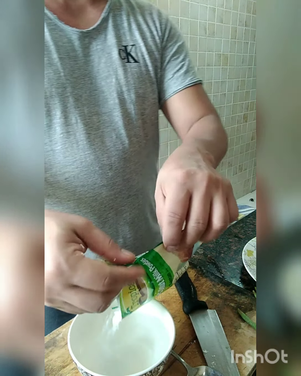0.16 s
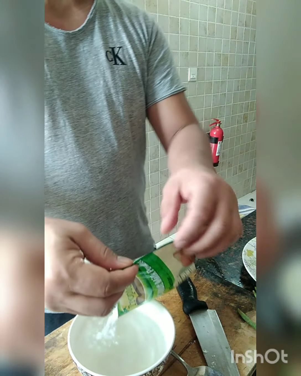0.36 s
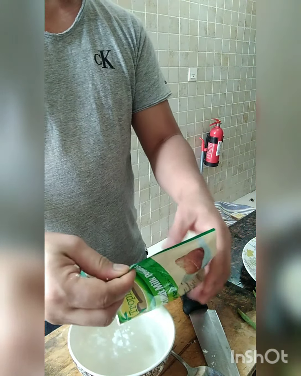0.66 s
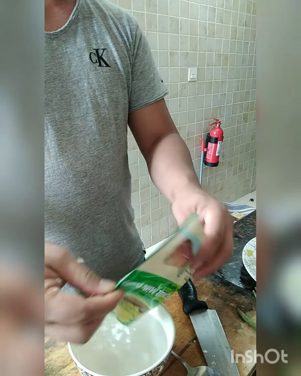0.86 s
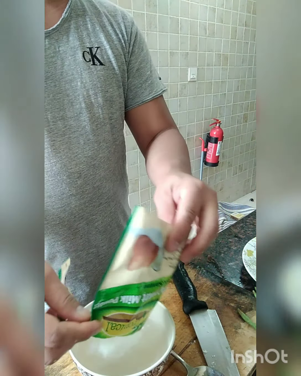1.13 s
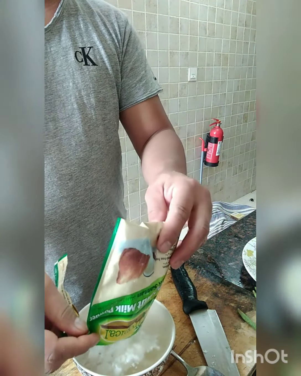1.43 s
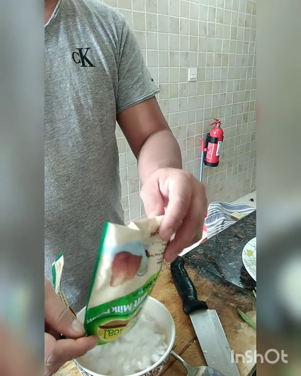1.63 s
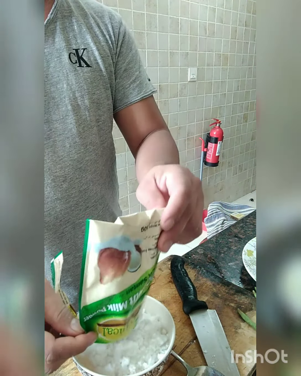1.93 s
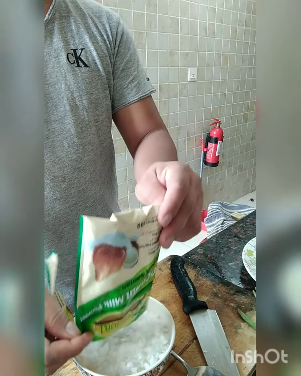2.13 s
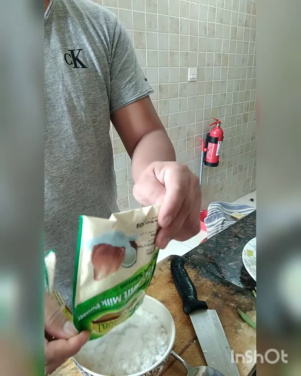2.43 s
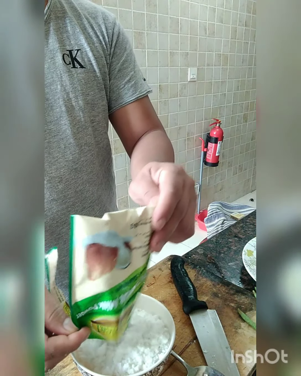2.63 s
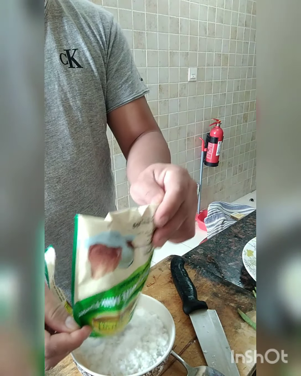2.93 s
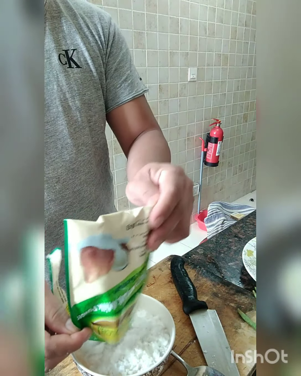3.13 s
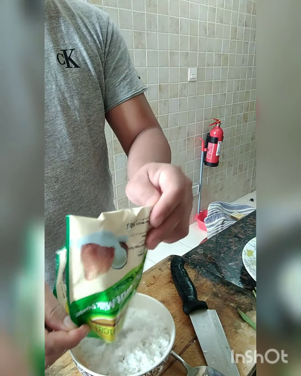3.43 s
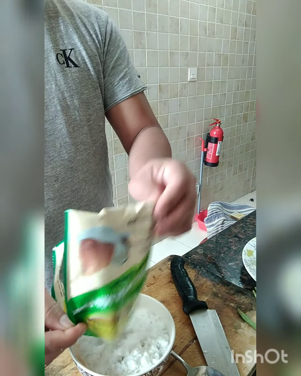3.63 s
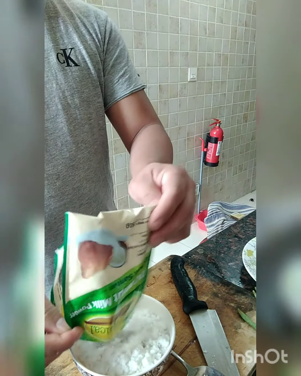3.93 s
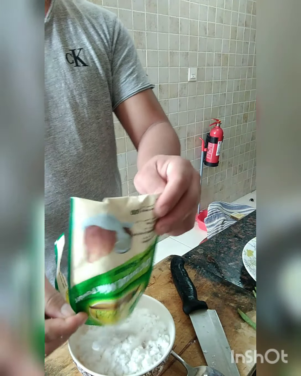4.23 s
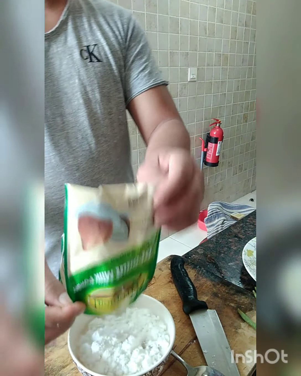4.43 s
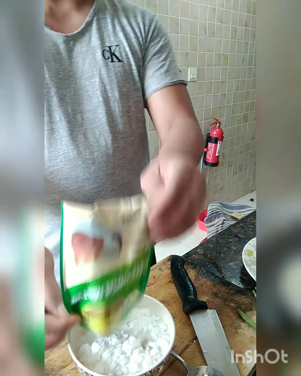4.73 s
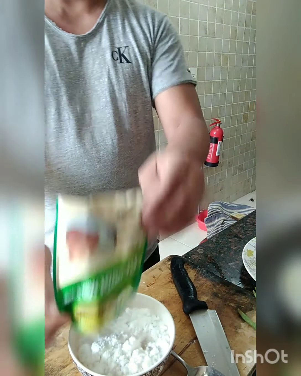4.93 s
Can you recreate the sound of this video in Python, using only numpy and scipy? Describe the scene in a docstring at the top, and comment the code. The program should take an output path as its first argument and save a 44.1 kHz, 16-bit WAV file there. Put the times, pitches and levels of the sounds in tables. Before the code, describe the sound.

A foil-lined plastic packet crackles and snaps sharply in the hands as it is shaken over a bowl in a tiled kitchen.

```python
"""Tiled kitchen: a foil-lined plastic sachet is flexed and shaken over a bowl.
Creases snap and crackle (shaped noise bursts and grains through pouch resonances), film rubs (noise strokes),
panels pop and walls ring (sines), shakes thud (decaying low sines), powder slides out (filtered noise).
The room rings after the snaps (noise tails); a two-port phone turns quiet bands down, cutting the tails' ends."""
import sys
import numpy as np
from scipy import signal
from scipy.fft import rfft, irfft, next_fast_len
from scipy.io import wavfile
from scipy.ndimage import uniform_filter1d, map_coordinates

SR = 44100
rng = np.random.default_rng(int(sys.argv[2]) if len(sys.argv) > 2 else 0)


def materialize(psi):
    """Save the field psi as 16-bit PCM at rate SR to the path in sys.argv[1].

    A 1-D psi becomes a single channel; in a 2-D psi each row is a channel.
    """
    bounded = np.clip(np.atleast_2d(psi).T, -1, 1)
    quanta = np.round(bounded * 32767).astype(np.int16)
    wavfile.write(sys.argv[1], SR, quanta)


N = 224145

# Levels are relative: a layer's gain_db adds to them.
# quiet kitchen, spectrum: [f/Hz, level/dB]
HUSH_SPECTRUM = [(25, -12), (60, 1.5), (100, -16.5), (160, 0), (300, -16.5), (800, -15), (2000, -26),
                 (5000, -33.5), (14000, -39)]
# tiled room, decay: [f/Hz, t60/s]
ROOM_DECAY = [(150, 0.43), (1000, 0.35), (4000, 0.43), (8000, 0.47), (14000, 0.42)]
# shakes of the packet: [t/s, level/dB, level drop per rebound/dB (negative: rebounds grow louder)]
SHAKES = [(0.0, -47.5, 22.5), (0.158, -49, 32.5), (1.313, -55.5, 18.5), (2.332, -39.5, 5),
          (3.212, -39.5, 18), (3.327, -43.5, 16.5), (3.457, -42, 6), (3.768, -36.5, 5.5), (4.912, -48, 35),
          (4.994, -38.5, -6)]
# thud partials: [f/Hz, level/dB, t60/s]
THUD_MODES = [(69.7, 7.5, 0.12), (99.07, 1.5, 0.39), (137.4, -10, 0.53)]
# powder sliding out, one stroke: [t/s, length/s, level/dB]
POUR_STROKE = (0.0039, 0.072, -71)
# panels of the pouch flipping over: [t/s, f/Hz, level/dB]
PANEL_POPS = [(0.382, 875, -35), (1.023, 718, -40.5), (1.023, 235, -49.5), (1.069, 922, -43),
              (4.135, 660, -44.5), (4.379, 1125, -46), (4.626, 1137, -51.5)]
# snaps that leave the taut walls ringing: [t/s, level/dB]
WALL_RINGS = [(0.547, -66), (4.378, -59), (4.767, -48.5), (4.9914, -47.5)]
# taut-wall partials: [f/Hz, level/dB]
WALL_MODES = [(1658, -4), (2390, -5.5)]
# fingertips sliding on film, one stroke: [t/s, length/s, level/dB]
SQUEAK_STROKE = (0.045, 0.13, -66)
# fingertip squeak partials: [f/Hz, level/dB]
SQUEAK_MODES = [(1610, -4.5), (2420, 9), (2950, -10), (4490, -4)]
# drags of slack film: [t/s, length/s, rise/s, level/dB, resonance f/Hz, glide/(Hz/s)]
DRAGS = [(0.0, 0.015, 0.05, -56.5, 261.4, 2), (1.754, 0.026, 0.15, -55.5, 450.4, 650.5),
         (1.873, 0.072, 0.028, -40, 611.8, -150), (1.919, 0.18, .06, -41.5, 495.6, -200)]
# scrapes of taut film: [t/s, length/s, level/dB, pitch ratio]
SCRAPES = [(1.886, 0.095, -51, 1.0), (2.096, 0.041, -39, 1.03), (2.168, 0.031, -44, 0.98),
           (2.326, 0.052, -52, 1.024)]
# taut-film resonances, before squaring: [f/Hz, width/Hz, level/dB]
TAUT_MODES = [(969, 128, 0), (1913, 140, 0.5), (2196, 360, -1), (2725, 260, -0.5), (3150, 77, -7)]
# squeezes working the small creases: [t/s, length/s, level/dB, brightness/dB]
SQUEEZES = [(1.043, 0.12, -57.5, -1), (1.904, 0.56, -52.5, -2), (2.705, 0.051, -54.5, 1.5),
            (2.902, 0.54, -75.5, -1), (3.316, 0.22, -61, -4), (3.669, 0.018, -42.5, 4.5),
            (3.865, 0.22, -50.5, -3)]
# creases snapping through: [t/s, level/dB, ring f/Hz, ring/dB, body/dB, edge/dB, glint/dB]
SNAPS = [(0.2144, -33, 2520, 24, 5, 6.5, 8), (0.2191, -35, 1580, 4, -8.5, -6, -30),
         (0.3568, -39, 1410, 9.5, -14, -10.5, -30.5), (0.3802, -23.0, 906, 13.5, -3.5, -6.5, 1),
         (0.5484, -45.5, 2570, 19.5, -4, -18, -18.5), (0.864, -45.5, 2440, 25, 6, 10, -11.5),
         (0.9032, -35, 3300, 2.5, -17.5, -18.5, -26.5), (0.9532, -32, 1970, 18, -0.5, 4.5, -6),
         (1.0175, -20.5, 1770, 16.5, 0, 11, 14.5), (1.024, -23.0, 1740, 10.5, 8, 2, 3),
         (1.069, -32.5, 1030, 14.5, -5.5, -13, -5), (1.1548, -39.5, 3300, -5, 0.5, 2, 12.5),
         (1.2811, -36.5, 1440, 24.5, 19.5, 11, -21), (1.324, -39.5, 1380, 22, 4, -5, 1),
         (1.651, -22, 2905, -10, 5, -3, -3.5), (1.749, -35, 1050, 8, -22, -9, -12),
         (1.8254, -24.5, 1460, 3, -11, 3, 1.5), (1.9063, -21.5, 2200, 5, 0.5, -3.5, -3.5),
         (2.0841, -26.5, 970, -11, -42, -3, 2), (2.1934, -30.5, 980, 3, 0, -13, -23),
         (2.23, -28, 996, 15.5, -19, -3, -8), (2.33, -29, 1750, 6, 10.5, -1, -17),
         (2.409, -23.5, 1310, 2, -1, 1.5, 2), (2.6385, -20.5, 6450, -1, -4, 2, 7),
         (2.6788, -28.5, 1156, 10.5, -20, -6, -5), (2.9057, -41.5, 2020, 17, -28, 4, -12),
         (2.921, -43.5, 2420, 8, -10, 5, -17), (2.9801, -43, 784, -2, -7.5, 2.5, 4),
         (3.0605, -40, 3130, 31.5, 2, 8, -24), (3.09, -45.5, 3160, 3, -7, -8, -20),
         (3.157, -40, 2160, 11, -5, 4.5, -2), (3.2897, -36.5, 1760, 3.5, 3.5, 7, -4),
         (3.3314, -33, 2140, 25.5, 18.5, 5, -27), (3.3634, -30.5, 2300, 17.5, 5.5, -1, 0.5),
         (3.3883, -26.5, 1900, 11, 5.5, -5.5, -2), (3.4591, -31.5, 4550, 3, -12, -15.5, -34),
         (3.4878, -25.5, 2140, 13, -3.5, -8, -49), (3.6324, -32.5, 2070, 28.5, -11, -9, 0.5),
         (3.6417, -20, 3380, 11.5, 2, 7, 11.5), (3.8151, -27, 1730, 5, -3, -5, -9),
         (3.879, -29, 1350, 2, -4, 2, -10), (3.957, -31.0, 3170, 9, 3, -11.5, -4),
         (3.9897, -25.5, 1330, 6.5, -13, -8.5, -14.5), (4.0323, -32, 2000, 11.5, 8.5, -7, -7),
         (4.0772, -29.5, 2710, 3, 5, 6.5, 11.5), (4.134, -30, 780, -18, -18, -10.5, -15.5),
         (4.1997, -32, 2240, 18.5, 0, -1.5, -24), (4.4609, -32, 2420, 22, -2, 7, 12),
         (4.4712, -32, 1300, 4, -28, -14, -15), (4.6804, -30.5, 2740, 12, -11, -8, -16),
         (4.6893, -30, 1460, -3, -9, -10, -22), (4.7675, -33, 1590, 9, -31, -6, -18),
         (4.87, -31, 3930, -6, -2, -16.5, -15), (4.991, -35.5, 2490, 20, -9, -16, -26),
         (5.0728, -29.5, 3000, 15.5, -11.5, 1.5, -15)]
# half-empty pouch, resonances: [f/Hz, width/Hz, level/dB]
POUCH_MODES = [(1116, 77, 10), (1603, 198, 1), (2470, 300, -3.5), (2984, 510, -6.5), (3982, 230, -0.5),
               (4780, 730, -9), (5470, 450, -9)]
# one snap of film, spectrum: [f/Hz, level/dB]
FILM_SPECTRUM = [(220, -0.5), (650, -22), (1050, 0.5), (2000, 8.5), (4500, 0.5), (7000, -5.5),
                 (10000, -13.5), (14000, -23)]
# phone ports, left minus right: [f/Hz, level/dB]
PORT_DIFFERENCE = [(100, -2), (500, -1.5), (1200, -5.5), (2200, -4.5), (4000, -11), (6000, -16),
                   (9000, -11.5), (13000, -1.5)]
# noise suppressor threshold: [f/Hz, level/dB]
GATE_THRESHOLD = [(100, -73), (500, -72.5), (1500, -74.5), (4000, -78), (8000, -90.5), (13000, -99)]

CREASES_PER_S, CREASE_SPREAD_DB = 1000, 2.2
REBOUND_S = 0.082  # powder slumps back and forth in the pouch
TOP_HZ = 14600


def amp(db):
    """Amplitude ratio from dB."""
    return 10 ** (np.asarray(db) / 20)


def unit(x):
    """Scale to RMS 1."""
    return x / np.sqrt(np.mean(x ** 2) + 1e-20)


def along(points, hz):
    """Interpolate (Hz, value) points on a log frequency axis."""
    f, v = np.transpose(points)
    return np.interp(np.log(hz + 1), np.log(f + 1), v)


def filtered(x, response):
    """Apply a complex frequency response by FFT."""
    n = x.shape[-1]
    m = next_fast_len(n + min(n, 2 ** 14))
    return irfft(rfft(x, m) * response(np.fft.rfftfreq(m, 1 / SR)), m)[..., :n]


def lowpassed(x, cut_hz):
    """Second-order Butterworth low-pass."""
    return signal.lfilter(*signal.butter(2, cut_hz, fs=SR), x)


def causal(gain):
    """Minimum-phase response with this gain, by folding the cepstrum."""
    cepstrum = irfft(np.log(np.maximum(gain, 1e-6)))
    half = len(cepstrum) // 2
    cepstrum[1:half] *= 2
    cepstrum[half + 1:] = 0
    return np.exp(rfft(cepstrum))


def resonances(modes, f):
    """Summed band-pass response of (Hz, width Hz, dB) modes."""
    return sum(amp(db) * 1j * f * w / (c * c - f * f + 1j * f * w) for c, w, db in modes)


def pair(size, apart):
    """Noise at two ports: a shared part plus each port's own."""
    return rng.standard_normal(size) + apart * rng.standard_normal((2, size))


def add(track, s, sound):
    """Mix a sound in at time s."""
    i = max(round(s * SR), 0)
    track[..., i:i + sound.shape[-1]] += sound[..., :max(N - i, 0)]


def grains(rate_per_s, spread_db):
    """Random tiny impulses of very uneven size, at two ports."""
    hits = rng.random(N) < rate_per_s / SR
    sizes = hits * amp(spread_db * np.minimum(rng.exponential(size=N), 3))
    return sizes * pair(size=N, apart=1.0)


def stroke(start_s, length_s, db, rise_s, release_s, fade_db_per_s=0):
    """Gain of one hand movement: swells, holds or fades, dies away (rise and release: time per 20 dB)."""
    t = np.arange(N) / SR - start_s
    outside = np.maximum(-t, 0) / rise_s + np.maximum(t - length_s, 0) / release_s
    return amp(db - 20 * outside - fade_db_per_s * np.clip(t, 0, length_s))


def whine(modes, t, waver_hz, patchy_db=2.5):
    """(Hz, dB) sine partials whose pitch and level waver quickly."""
    knots = t * 150  # 150 random points per s

    def waver():
        return map_coordinates(rng.standard_normal(int(knots[-1]) + 2), [knots])

    out = 0
    for hz, db in modes:
        level = amp(db + patchy_db * waver())
        out = out + level * np.sin(2 * np.pi * np.cumsum(hz + waver_hz * waver()) / SR)
    return out


def film(f, plain=0.4):
    """Gain of a crease radiating directly and through the pouch's resonances."""
    return amp(along(FILM_SPECTRUM, f)) * (plain + abs(resonances(POUCH_MODES, f)))


def hush(floor_db=-67, drone_db=-68):
    """Low kitchen background: shaped noise, plus a wavering drone of narrow-band noise."""
    air = filtered(pair(size=N, apart=0.61), lambda f: amp(along(HUSH_SPECTRUM, f)))
    drone = filtered(pair(size=N, apart=0.068), lambda f: resonances([(98.0, 37.0, 0)], f) ** 2)
    return amp(floor_db) * unit(air) + amp(drone_db) * unit(drone)


def kitchen(x, wet_db=-1, delay_s=0.0025, dull_db=-1):
    """Tiled walls answer with decaying noise; the tail changes each quarter second as the hands move."""
    out, size = np.zeros((2, N)), SR // 4
    for start in range(0, N, size):
        hz, t, z = signal.stft(rng.standard_normal((2, SR // 2)), SR, nperseg=256)
        decay = amp(-60 * t / along(ROOM_DECAY, hz)[:, None])
        tail = signal.istft(z * decay, SR, nperseg=256)[1]
        tail *= np.arange(tail.shape[1]) > delay_s * SR
        tail /= np.linalg.norm(tail[0])
        add(out, start / SR, signal.fftconvolve(x[:, start:start + size], tail, axes=1))
    return filtered(out, lambda f: amp(wet_db + along([(3000, 0.014), (12000, dull_db)], f)))


def thuds(gain_db=0, count=3, detune=0.039):
    """Each shake excites decaying low modes, again at each powder rebound, its level changed by the drop."""
    out, t = np.zeros(N), np.arange(SR // 2) / SR
    swell = 1 - np.exp(-(t / .016) ** 2)
    for s, db, drop_db in SHAKES:
        for k in range(count):
            boom = 0
            for hz, mode_db, t60_s in THUD_MODES:
                mode_hz = hz * rng.normal(1, detune)
                boom = boom + amp(mode_db - 60 * t / t60_s) * np.sin(2 * np.pi * mode_hz * t)
            add(out, s + k * REBOUND_S, amp(db + gain_db - k * drop_db) * boom * swell)
    return out


def pour(rise_s=0.094, release_s=0.18):
    """Fine powder sliding over foil: smooth, faint noise."""
    spectrum = [(700, -20), (1500, 1.5), (5000, -7.5), (13000, -20.0)]
    hiss = filtered(pair(size=N, apart=1.0), lambda f: amp(along(spectrum, f)))
    return stroke(*POUR_STROKE, rise_s, release_s) * unit(hiss)


def pops(t60_s=0.052, rise_s=0.0044):
    """A flipping panel pushes the air in the pouch: a short, hollow sine."""
    out, t = np.zeros(N), np.arange(SR // 4) / SR
    for s, hz, db in PANEL_POPS:
        note = np.sin(2 * np.pi * hz * t) * (1 - np.exp(-t / rise_s))
        add(out, s, amp(db - 60 * t / t60_s) * note)
    return out


def rings(t60_s=0.26):
    """Taut walls ring on after a snap, pitch bending as the hands move."""
    out, t = np.zeros(N), np.arange(SR // 2) / SR
    for s, db in WALL_RINGS:
        add(out, s, amp(db - 60 * t / t60_s) * whine(WALL_MODES, t, waver_hz=34.2))
    return out


def squeak(rise_s=0.15, release_s=.04):
    """Fingertips slide on the film: a faint, thin whine."""
    tone = whine(SQUEAK_MODES, np.arange(N) / SR, waver_hz=28)
    return stroke(*SQUEAK_STROKE, rise_s, release_s) * unit(tone)


def dull_rub(width_hz=36, gain_db=-2, skirt_hz=210, skirt_db=-13, release_s=0.049, fade_db_per_s=55):
    """Slack film drags: low-passed noise shifted up to a hollow, gliding resonance."""
    out, t = np.zeros((2, N)), np.arange(N) / SR
    for s, length_s, rise_s, db, hz, glide_hz_per_s in DRAGS:
        pitch_hz = hz + glide_hz_per_s * np.clip(t - s, -rise_s, length_s)
        phase = 2 * np.pi * np.cumsum(pitch_hz) / SR
        slips = pair(size=N, apart=0.68) + 1j * pair(size=N, apart=0.99)
        band = lowpassed(slips, width_hz) + amp(skirt_db) * lowpassed(slips, skirt_hz)
        shifted = np.real(band * np.exp(1j * phase))
        hollow = filtered(shifted, lambda f: amp(along([(640, 4), (760, -17)], f)))
        out += stroke(s, length_s, db + gain_db, rise_s, release_s, fade_db_per_s) * unit(hollow)
    return out


def tight_rub(rate_per_s=1700, spread_db=2.5, fizz=0.04, gain_db=-1, rise_s=0.092, release_s=0.18):
    """Taut film scrapes: dense slips excite sharper resonances, shifted by the pull of each stroke."""
    out = np.zeros((2, N))
    for s, length_s, db, ratio in SCRAPES:
        def body(f):
            return causal(abs(resonances(TAUT_MODES, f / ratio)) ** 2 + fizz * film(f))

        scrape = filtered(grains(rate_per_s, spread_db), body)
        out += stroke(s, length_s, db + gain_db, rise_s, release_s) * unit(scrape)
    return out


def crackle(gain_db=-3, top_db=-1, rise_s=0.038, release_s=0.1):
    """Small creases rustle in clumps with each squeeze, brighter where the foil is tight."""
    out, knots = np.zeros((2, N)), np.arange(N) * 90 / SR  # 90 random points per s
    clumps = amp(3.5 * map_coordinates(rng.standard_normal(int(knots[-1]) + 2), [knots]))
    creases = clumps * grains(CREASES_PER_S, CREASE_SPREAD_DB)
    for s, length_s, db, bright_db in SQUEEZES:
        def colour(f):
            tilt_db = along([(2500, 0), (4200, bright_db), (8000, top_db)], f)
            return causal(film(f) * amp(tilt_db))

        out += stroke(s, length_s, db + gain_db, rise_s, release_s) * unit(filtered(creases, colour))
    return out


def snaps(buckle_s=0.0049, flutter_db=-22, flutter_t60_s=0.18, lead_in_db=-20, lead_in_s=0.0082,
          ring_width_hz=340, gain_db=2.5, shake=0.9, plain_db=-8, spread=.4, around_db=3, echo=0.83,
          warm_db=6, linger=0.44, narrowing=0.24, flex=0.018, low_hz=560):
    """Creases strain, buckle in a few ms, flutter out; returns sound straight ahead and all around."""
    lead_s = .015
    ahead, around = np.zeros((2, N)), np.zeros((2, N))
    t = np.arange(4096) / SR - lead_s
    usual_db = np.median(SNAPS, axis=0)[1]
    for s, db, ring_hz, ring_db, body_db, edge_db, glint_db in SNAPS:
        # gentle snaps mostly ring the pouch; hard ones shake the whole film, with a louder flutter
        force_db = db - usual_db
        plain = amp(plain_db + spread * force_db)
        flutter = amp(flutter_db + shake * force_db - 60 * t / flutter_t60_s)
        buckle = np.exp(-(t / buckle_s) ** 4) + flutter
        # gentle snaps get a relatively stronger noise lead-in
        lead_in = amp(lead_in_db - .5 * force_db) * np.exp(-abs(t) / lead_in_s)
        shape = np.where(t < 0, lead_in, buckle)
        echo_s = rng.uniform(.0009, .0015)
        stretch = rng.normal(1, flex)  # pouch pitch shifts as it flexes
        flexed = [(hz * stretch, narrowing * width, level) for hz, width, level in POUCH_MODES]

        def tone(f):
            return amp(along([(1150, body_db), (1700, 0), (2500, 0), (4000, edge_db), (7000, edge_db),
                              (11000, glint_db)], f))

        def comb(f):  # a reflection off the counter echoes the treble
            return abs(1 + along([(2500, 0.028), (6000, echo)], f) * np.exp(-2j * np.pi * f * echo_s))

        def facet(f):  # facet beside the crease rings at its own pitch
            ring = abs(resonances([(ring_hz, ring_width_hz, 0)], f)) ** 2
            return amp(ring_db) * ring * f ** 6 / (f ** 6 + low_hz ** 6)

        def sharp(f):
            return film(f, plain) * tone(f) * comb(f) + facet(f)

        def even(f):  # notches partly fill in, low body spreads further, pouch rings on
            ringing = linger * amp(along(FILM_SPECTRUM, f)) * abs(resonances(flexed, f))
            spread_out = (film(f, plain * amp(around_db)) + ringing) * tone(f) + facet(f)
            return spread_out * amp(along([(450, 0), (750, warm_db), (1150, 0.015)], f))

        burst = shape * pair(size=len(t), apart=1.0)
        for track, colour in (ahead, sharp), (around, even):
            snap = filtered(burst, lambda f: causal(colour(f)))
            snap /= np.sqrt(np.sum(snap ** 2) / 20)  # equal energy
            add(track, s - lead_s, amp(db + gain_db) * snap)
    return ahead, around


def scene():
    """Mix the layers at the phone's two ports: one faces the hands, the other is shaded by the phone."""
    ahead, around = snaps()
    rustle = crackle() + dull_rub() + tight_rub() + pour() + pops()
    room = kitchen(around + rustle)
    sound = ahead + rustle + squeak() + rings() + room + thuds() + hush()
    return filtered(sound, lambda f: amp(np.outer([.5, -.5], along(PORT_DIFFERENCE, f))))


def suppress(x, depth_db=-13, hold_s=0.0043):
    """Noise suppressor: loud sounds hold each band open for a moment, quiet bands are turned down."""
    hz, t, z = signal.stft(x, SR, nperseg=256)
    power = abs(uniform_filter1d(np.mean(abs(z) ** 2, axis=0), size=5, axis=0))
    keep = np.exp(-t[1] / hold_s)
    held = np.maximum(power, signal.lfilter([1 - keep], [1, -keep], power))
    excess = held / amp(along(GATE_THRESHOLD, hz))[:, None] ** 2
    gain = (amp(depth_db) + excess) / (1 + excess)
    return signal.istft(z * gain, nperseg=256)[1][:, :N]


def record(dry, low_cut_hz=42):
    """Phone: suppresses quiet noise, thins deep bass, cuts steeply above TOP_HZ."""
    thinned = signal.lfilter(*signal.butter(2, low_cut_hz, "high", fs=SR), suppress(dry))
    return filtered(thinned, lambda f: 1 / np.sqrt(1 + (f / TOP_HZ) ** 120))


dry = scene()
out = record(dry)
materialize(out)
```